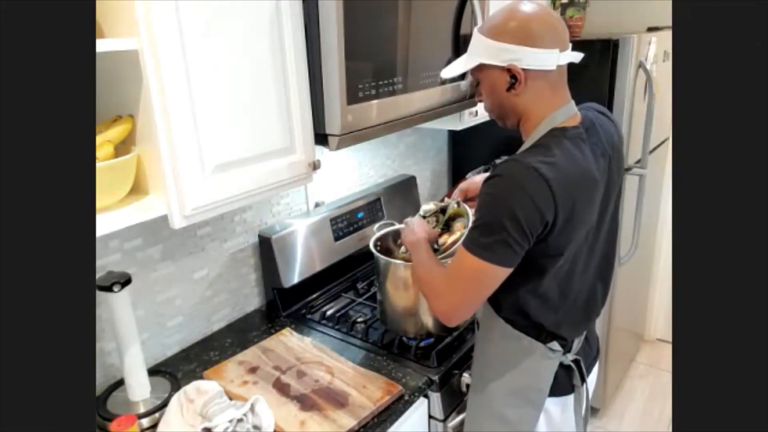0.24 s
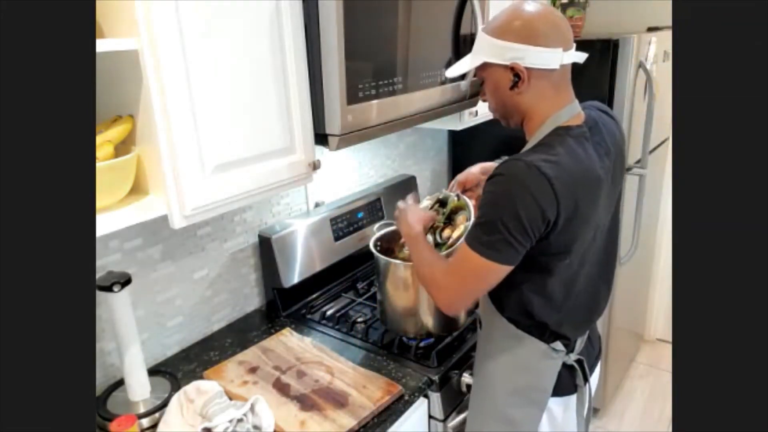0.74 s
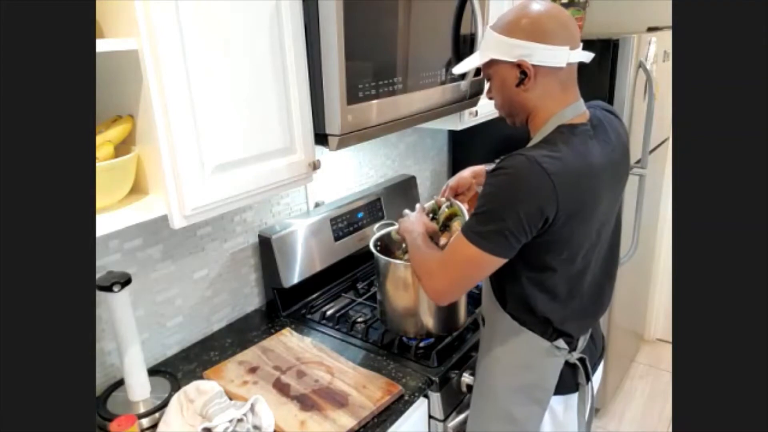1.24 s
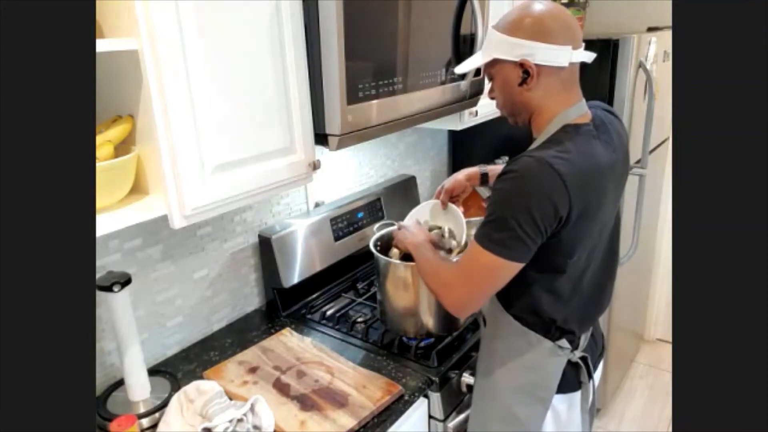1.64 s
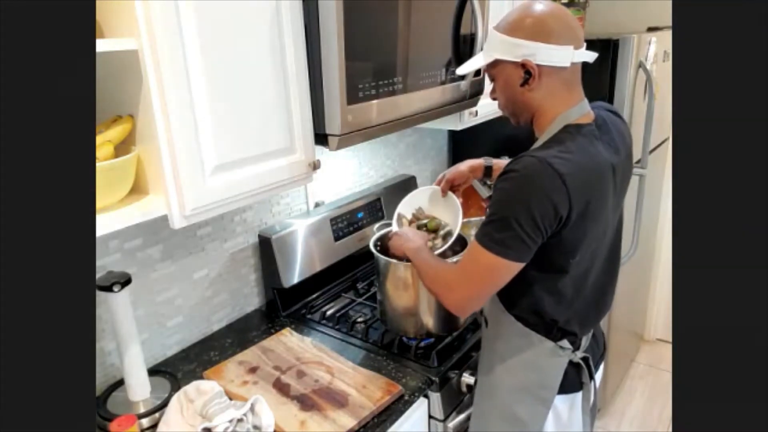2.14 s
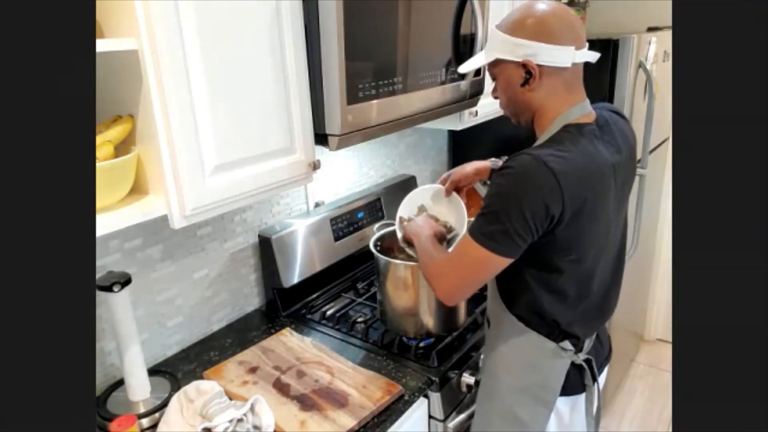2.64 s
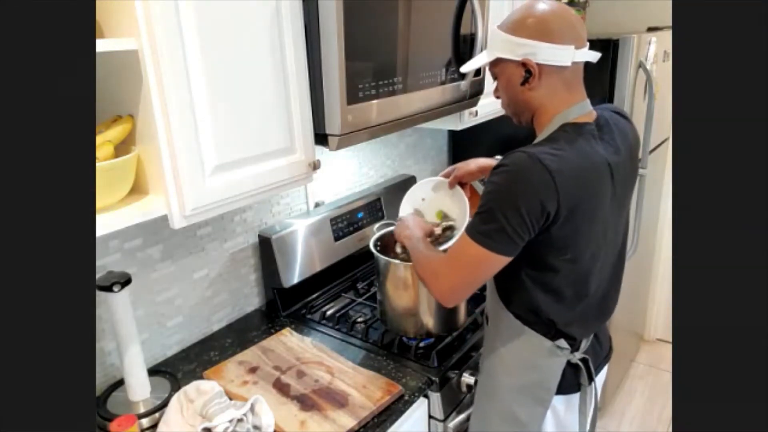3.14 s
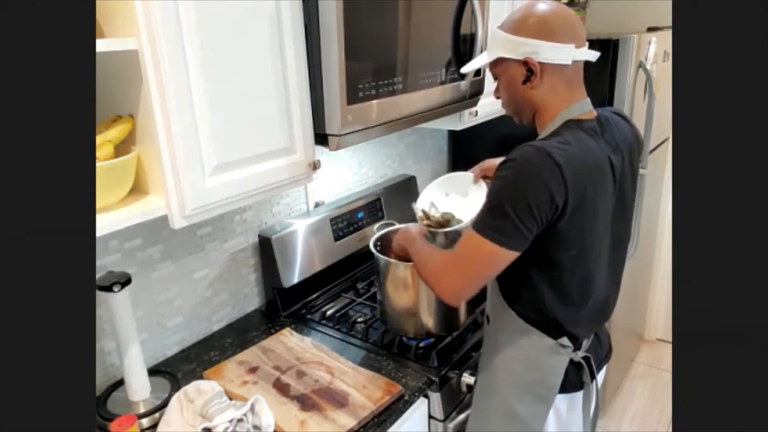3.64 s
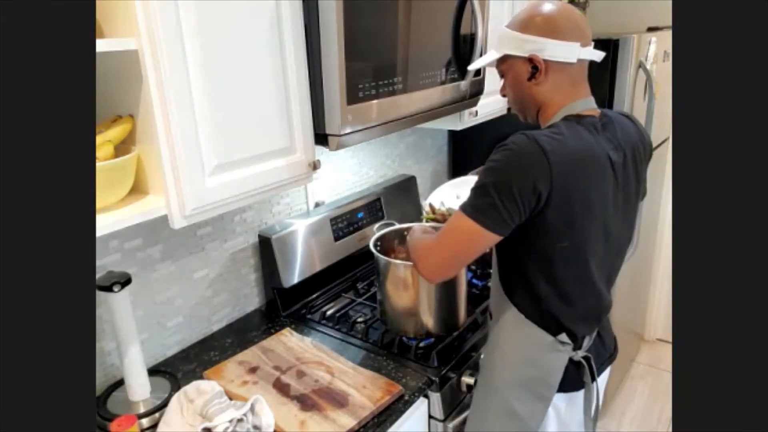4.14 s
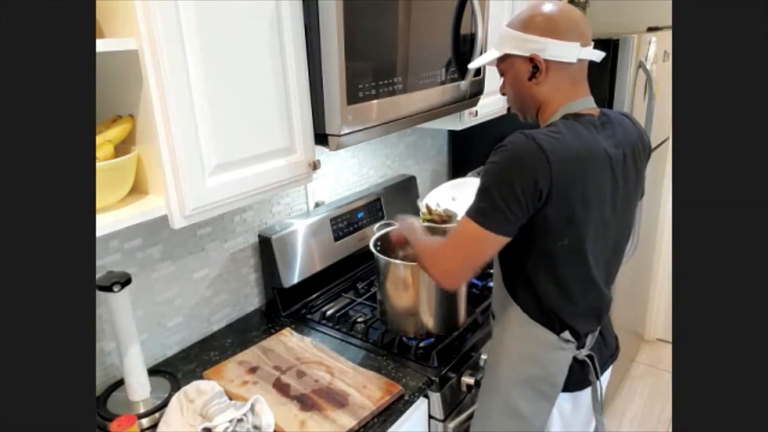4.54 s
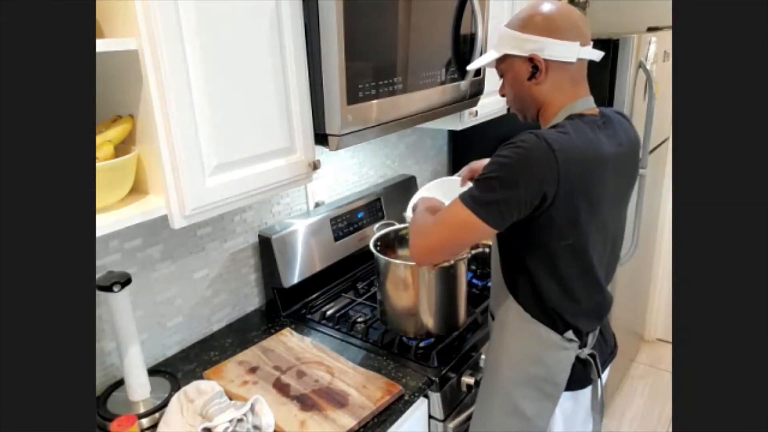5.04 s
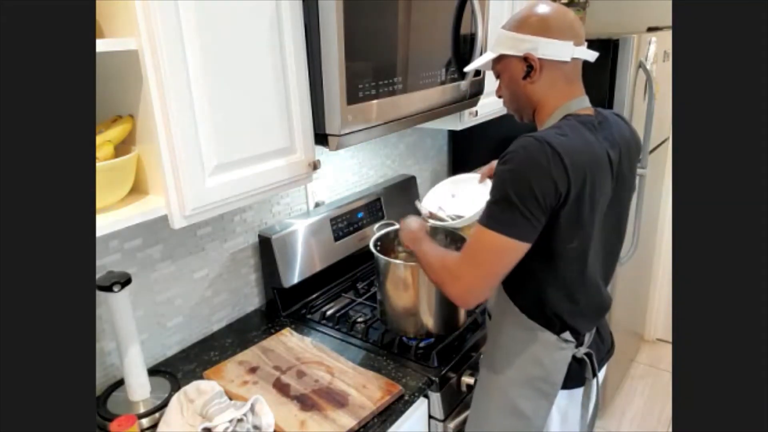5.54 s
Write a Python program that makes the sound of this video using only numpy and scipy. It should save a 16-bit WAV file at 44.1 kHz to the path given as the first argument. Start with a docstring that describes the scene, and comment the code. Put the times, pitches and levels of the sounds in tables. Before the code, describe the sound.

Mussel shells are pushed by hand from a bowl into a steel pot in a hard-walled kitchen. From 0 to 0.3 s strong, hollow knocks arrive in quick succession with a burst of rattle against the pot. Irregular clacks and small scrapes follow until 1.3 s. From 1.4 to 2.15 s the shells pour in a dense, loud, bright clatter, the peak near 1.6 s. A short gap follows, then light clicks and a soft low thump about 2.45 s, with small squeaky rubs to 2.9 s. A second cluster of knocks runs 3.0 to 3.5 s, thinning to faint sparse ticks until 4.4 s. A sharp clack sounds at 4.47 s, a more resonant pair near 4.9 s, and several crisp knocks at 5.1 to 5.4 s, then near silence. The sound is fairly close and speech-band, with little bass; noise suppression cuts echoes abruptly, leaving very faint hiss that drops near 5.7 s.

```python
"""Knock after knock from the start, with handfuls of small shells rattling in between: mussel shells are
pushed by hand out of a bowl into a steel pot. Knocks are bursts of contacts ringing shell and pot modes;
rattling is random ticks; scrapes are noise through one resonance; one low thump is a sinking sine.
Place: a hard-walled kitchen. Distance: direct sound ahead of the echo. Microphone: speech-band,
with a noise suppressor that cuts every tail off into near silence."""
import sys
import numpy as np
from scipy import signal
from scipy.io import wavfile
from scipy.ndimage import uniform_filter1d

SR = 44100
rng = np.random.default_rng(int(sys.argv[2]) if len(sys.argv) > 2 else 0)


def int16_out(signal):
    """Quantize to a 16-bit WAV file."""
    q = np.round(np.clip(np.atleast_2d(signal).T, -1, 1) * 32767)
    wavfile.write(sys.argv[1], SR, q.astype(np.int16))


N = 255780

# Handfuls of small shells sliding and settling:
# [start t/s, length t/s, relative level/dB, pot wall share level/dB]
SLIDES = [(0, 0.064, -23.5, 13.5), (0.17, 0.17, -42, -9.5), (0.41, 0.26, -60, -48),
          (0.963, 0.16, -46, -9.5), (1.412, 0.72, -28.5, -1.5), (2.089, 0.14, -31, -24.5),
          (2.531, 0.13, -39.5, -22.5), (2.909, .38, -38, 13.5), (4.549, 0.067, -55, -20.5),
          (4.996, 0.2, -72.5, -17)]
# Modes of the steel pot: [f/Hz, relative level/dB, base t60 t/s]
POT_MODES = [(222, -11, 0.017), (290.4, -2, 0.26), (428, -20.5, 0.3), (562, -15, 0.17), (676, -9.5, 0.3),
             (744, 9, 0.095), (806, 6.5, 0.06), (967, 8, 0.02), (1020, -8.5, 0.3)]
# Reverberation of the kitchen: [f/Hz, t60 t/s]
KITCHEN_DECAY = [(250, 0.34), (700, 0.43), (2000, 0.38), (6000, 0.2)]
# Shells knocking: [t/s, peak level/dB, strongest shell ring f/Hz, edge against body level/dB,
# pot thump against peak level/dB, ring against peak level/dB, settling neighbours against blow level/dB]
KNOCKS = [(0.0241, -7.5, 695, -5, -13, 1, -10), (0.0841, -7, 1180, -4.5, -16, -1.5, -11),
          (0.157, -5, 5490, 1, -6, -5.5, -5.5), (0.2594, -12.5, 1580, -8, -12, -4, -9),
          (0.391, -26, 4400, -7, -45, -7, -0.5), (0.4454, -34.5, 1980, -4, 13, 7, -1),
          (0.5669, -12, 6060, 1.5, -13.5, -7, -3.5), (0.6454, -22.5, 905, -1, -9.5, -5, 2),
          (0.7185, -36, 780, -5, -24, 5, -12), (0.738, -16, 4540, -1.5, -21.5, -2.5, -2.5),
          (0.8267, -16, 3210, 0, -60, -3.5, -3), (0.921, -17, 2780, -5, -15, 0, -2),
          (0.9469, -11, 904, -18, 2, 3.5, -3), (1.0939, -33, 2590, -15, 3.5, 5, 5),
          (1.1211, -8.5, 782, -3.5, -6.5, 0.5, -7), (1.1405, -23.5, 1010, -10.5, -8.5, 9, -5),
          (1.2055, -23.5, 880, -1.5, -1, 1, 4.5), (1.3851, -18.5, 5200, 11.5, -44, 1, 0),
          (1.428, -16, 5130, 3.5, -24.5, -8, -10.5), (1.491, -13.5, 4390, -24.5, -33.5, -1.5, -5),
          (1.5636, 0, 4840, -3.5, -20, -12, -4), (1.6036, -8, 3030, -9, -19.5, -15, -8.5),
          (1.6172, -10, 5090, -3.5, -25, -5, -7), (1.635, -0.5, 2980, -16.5, -25.5, -4.5, -9),
          (1.6537, -18, 2460, -16, 9, -19, 1.5), (1.7064, -7.5, 1370, -4, -20.5, -12, -7),
          (1.7195, -13, 2900, 4.5, -16, -23, -2.5), (1.8149, -2.5, 1184, 0.5, -24, -5, -1),
          (1.8445, -9.5, 5140, 10, -24, -4, -14.5), (1.9175, -17, 5230, -12, 4.5, -5.5, -9),
          (1.9385, -15.5, 1440, -4.5, -1.5, -3, 3), (1.9665, -15.5, 5000, -3, -21.5, 1, -13.5),
          (2.0033, -10.5, 5330, 4.5, -8.5, -25, -3), (2.0492, -13, 2890, -13, -39, -4.5, -24),
          (2.0718, -30, 1450, -17, -13.5, 12.5, -7), (2.0931, -13.5, 5260, -4.5, -30, -3.5, -14.5),
          (2.1066, -14.5, 4410, 18, -34, 1, -10.5), (2.1171, -9, 2980, 2, -41, -7, 1),
          (2.1288, -8, 1550, -3.5, -1, -5.5, -10.5), (2.3825, -29, 3290, 8, -60, -1, -11.5),
          (2.4533, -18, 5780, 23.5, -32, -7.5, -1), (2.4636, -13, 5030, 13.5, -43.5, 2, -1),
          (2.626, -33, 3250, 0.5, -71.5, -2.5, -12), (2.643, -31.5, 2980, 16.5, -57, 3, -8.5),
          (2.6903, -19.5, 1690, -14.5, -22.5, -5.5, -10.5), (2.7165, -18.5, 1620, -23, -9, 9, -17.5),
          (2.839, -39.5, 1530, -8, -17.5, -4.5, 1.5), (2.9023, -22.5, 740, -8.5, -11, -2, -0.5),
          (2.9761, -21.5, 3940, 7.5, -32, -12, 3), (3.0263, -6.5, 1620, -3.5, -9, -6.5, -12),
          (3.051, -12.5, 3460, 2, 0, -8, -12.5), (3.086, -9, 4840, 4, -14.5, -5.5, -9.5),
          (3.112, -24, 5350, 1, -11, 3.5, -9.5), (3.1589, -10, 3090, 2.5, -40, -4.5, -3),
          (3.234, -15.5, 3020, -17, -7, -11, -5.5), (3.261, -23.5, 1530, -0.5, -20.5, 0, -0.5),
          (3.3059, -22, 3990, -6.5, -7, -0.5, 1), (3.3348, -13, 1535, -3.5, -40, -10.5, -6.5),
          (3.4341, -20, 2094, 16.5, -54, 0, -5), (3.6029, -19, 4960, 21, -21, -21, -1.5),
          (3.6912, -26, 4890, 10.5, -77, -3.5, -10), (3.9041, -27, 5400, -6, -37, -11.5, -0.5),
          (4.0548, -25, 5780, 2, -39, -7, 1.5), (4.101, -23, 5450, 2.5, -27.5, -7, 3.5),
          (4.1934, -48.5, 4230, -9.5, -51, 3, -12.5), (4.2547, -48.5, 4010, -3.5, -56, 5, -8.5),
          (4.413, -30, 5110, 6.5, -34, -10.5, 1.5), (4.4691, -3.5, 5650, 0, -25, -8, 0.5),
          (4.5871, -16.5, 6440, 4.5, -28.5, -18, 3), (4.6262, -19.5, 3920, 2, -30.5, -12.5, -11),
          (4.8529, -32.5, 3040, -5, -2, 1.5, -3), (4.887, -8.5, 4975, -10, 3.5, -2, -5.5),
          (4.9297, -13.5, 634, 4.5, 4.5, 10.5, 1), (5.0585, -25.5, 2870, -14, -16, -23, -3),
          (5.1269, -19, 4680, -18, -37, -10, -6), (5.1898, -11, 3130, -7.5, -1.5, -8.5, -5.5),
          (5.2617, -6.5, 3730, -4, -39.5, -9.5, -7.5), (5.2877, -21, 4770, 0.5, -39, 8, 4),
          (5.3817, -19.5, 3560, -9, -37, 2, -8.5), (5.4335, -33.5, 3035, -16.5, -42, 7, -1)]
# Shells rubbing along bowl or pot, singing at one resonance: [t/s, length t/s, f/Hz, rms level/dB]
SCRAPES = [(0.392, 0.07, 4140, -54), (0.396, 0.055, 6220, -65), (0.438, 0.29, 835, -40),
           (.63, 0.15, 810, -36.5), (1.197, .13, 882, -40.5), (2.38, 0.031, 2200, -49.5),
           (2.382, 0.063, 3530, -49.5), (2.375, .05, 5600, -57.5), (2.647, 0.12, 1610, -37.5),
           (2.648, 0.12, 2926, -45), (2.678, 0.053, 4880, -42), (2.717, 0.078, 880, -34),
           (2.823, 0.055, 1473, -33.5), (3.691, 0.019, 2223, -41), (4.227, 0.051, 3993, -52.5),
           (4.851, 0.24, 3020, -42.5), (5.128, 0.03, 1490, -41)]
# Suppressor threshold, below which a band is turned down: [f/Hz, level/dB]
SUPPRESSOR_THRESHOLD = [(200, -66), (700, -55), (2000, -62.5), (4000, -79), (7000, -77.5)]
# Frequency response of the microphone: [f/Hz, level/dB]
MICROPHONE_RESPONSE = [(30, -39.5), (200, -21.5), (400, -7.5), (6300, 5), (7100, -6.5), (8000, -20.5),
                       (9200, -27.5), (11500, -27.5), (12500, -56), (15000, -68)]
# Spectrum shape of the hiss left in the silences: [f/Hz, relative level/dB]
HISS_SPECTRUM = [(20, -10.5), (100, 0.5), (1000, -6.5), (8000, -6), (12000, -12), (16000, -21.5)]

SLIDE_RISE_DB_PER_S, SLIDE_FALL_DB_PER_S = 304, 244.5
TICKS_PER_S = 500  # on average
BODY_HZ, EDGE_HZ = (1300, 3600), (3600, 7300)  # mode bands of a shell's body and edge
CRUNCH_S, RING_T60_S = .0058, 0.022  # time scale of one blow's contacts; life of the clear ring
SETTLE_RISE_S, SETTLE_FALL_S = 0.0045, 0.044  # neighbours shifting after a knock
THUMP_S, THUMP_DB, THUMP_T60_S = 2.46, -19.5, 0.15  # time, starting level, life
THUMP_HZ, THUMP_SAG_PER_S = 168, 12  # starting pitch and the rate at which it sinks
LAG = 0.13  # share of the suppressor's gain carried over from one 3 ms frame to the next
HISS_DB, OFFSET_DB = -85, -81.5  # hiss rms and converter offset, before the final band limit
CUT_HZ = 15100  # final band limit


def amp(db):
    """Amplitude factor of a level in dB."""
    return 10 ** (np.asarray(db) / 20)


def unit(x):
    """Scales to energy 1."""
    return x / np.linalg.norm(x)


def peaked(x):
    """Scales to peak 1."""
    return x / abs(x).max()


def read(points, hz):
    """Value of a spectrum table at the frequencies hz, interpolated over log frequency."""
    f, value = np.transpose(points)
    return np.interp(np.log(hz + 1), np.log(f + 1), value)


def add(mix, s, sound):
    """Adds a sound at second s."""
    part = mix[round(s * SR):][:len(sound)]
    part += sound[:len(part)]


def coloured(x, points):
    """Causal minimum-phase filter with the given dB curve."""
    log_gain = np.log(amp(read(points, abs(np.fft.fftfreq(8192, 1 / SR)))))
    taps = np.fft.ifft(np.exp(np.conj(signal.hilbert(log_gain)))).real[:2048]
    return signal.oaconvolve(x, taps)[:N]


def ring(hz, db, t60, size=6000):
    """Modes of a struck body: a sum of dying sines, peak 1."""
    t = np.arange(size) / SR
    hz, db, t60 = (np.reshape(v, (-1, 1)) for v in (hz, db, t60))
    modes = amp(db - 60 * t / t60) * np.sin(2 * np.pi * hz * t)
    return peaked(modes.sum(0))


def shell(band_hz, draws, t60, spread_db):
    """Every shell differs: short modes at chance places in a band."""
    place, size, life = draws
    low, high = band_hz
    return ring(low + (high - low) * place, spread_db * size, t60 * (.5 + life), size=1000)


def rattle():
    """Many small ticks, a few large, each ringing one of a heap of shells and the pot wall."""
    t = np.arange(N) / SR
    level, on_wall = np.zeros(N), np.zeros(N)
    for s, length, db, wall_db in SLIDES:
        rise = SLIDE_RISE_DB_PER_S * (t - s)
        fall = SLIDE_FALL_DB_PER_S * (s + length - t)
        slide = amp(db + np.minimum(0, np.minimum(rise, fall)))
        level += slide
        on_wall += slide * amp(wall_db)
    sizes = amp(5.1 * np.minimum(rng.exponential(1, N), 5))
    ticks = sizes * (rng.random(N) < TICKS_PER_S / SR)
    which, draws = rng.integers(0, 12, N), rng.random((12, 3, 24))  # each tick picks one of twelve shells
    heap = np.zeros(N)
    for k, d in enumerate(draws):
        one_shell = shell((BODY_HZ[0], EDGE_HZ[1]), d, .01, 12)
        heap += signal.oaconvolve(ticks * level * (which == k), one_shell)[:N]
    wall = signal.oaconvolve(ticks * on_wall, ring(*np.transpose(POT_MODES)))[:N]
    tick_scale = np.sqrt((ticks ** 2).sum() / N * 50)
    return amp(5) * (heap + 0.16 * wall) / tick_scale


def kitchen(x):
    """Sparse reflections of random sign, each band dying at its own speed.

    Three random echo patterns fade into one another in turn, keeping the tail even."""
    out = np.zeros(N)
    turn = np.arange(N) / SR * 2 * np.pi * 9
    for k in range(3):
        taps = np.zeros(SR // 2)
        places = np.arange(400, 22000, 20) + rng.integers(0, 20, 1080)
        taps[places] = rng.choice([-1., 1.], 1080)
        hz, t, z = signal.stft(taps, SR, nperseg=256)
        decay = amp(-60 * t / read(KITCHEN_DECAY, hz)[:, None])
        tail = signal.istft(z * decay, SR, nperseg=256)[1]
        share = np.sqrt(2 / 3) * np.cos(turn + k * np.pi / 3)  # the three squared shares sum to 1
        out += signal.fftconvolve(x * share, unit(tail))[:N]
    return out


def knocks():
    """A crunch of tiny contacts rings the shell's modes and thumps the pot; the neighbours then settle."""
    out, rings = np.zeros(N), np.zeros(N)
    draws = rng.random((len(KNOCKS), 3, 50))
    grit = rng.standard_normal((len(KNOCKS), 3, 5000))
    pot_hz, pot_db, pot_t60 = np.transpose(POT_MODES)
    t = np.arange(5000) / SR
    blow = t * np.exp(-(t / CRUNCH_S) ** 2)  # swells, then stops short
    settle_shape = (1 - np.exp(-t / SETTLE_RISE_S)) ** 2 * np.exp(-t / SETTLE_FALL_S)
    thud = ring([710, 450, 310, 162], [1.5, -3.5, -5.5, -7.5], [.012, .02, .03, .04])
    for (s, db, hz, edge_db, thump_db, note_db, settle_db), d, g in zip(KNOCKS, draws, grit):
        start = max(s - .001 - .3 * CRUNCH_S, 0)
        settle = settle_shape * amp(12 * uniform_filter1d(g[2], size=100))
        force = unit(blow) + amp(settle_db) * unit(settle)
        contacts = force * g[0] * amp(3.76 * g[1])  # uneven: a few contacts stand out

        body = signal.oaconvolve(contacts, shell(BODY_HZ, d[:, :16], .011, 8))
        edge = signal.oaconvolve(contacts, shell(EDGE_HZ, d[:, 16:40], .007, 8))
        add(out, start, amp(db) * peaked(unit(body) + amp(edge_db) * unit(edge)))
        # unfiltered contact noise, adding faint treble above the shell modes
        add(out, start, amp(db - 19.5) * peaked(contacts))

        clear_ring = ring([hz, 0.47 * hz], [0, -6], [RING_T60_S, 0.18 * RING_T60_S], size=2000)
        note = signal.oaconvolve(clear_ring, blow[:1500] * g[2, :1500])
        add(rings, start, amp(db + note_db) * peaked(note))

        # the struck spot picks the pot's modes
        wall = ring(pot_hz, pot_db + 7 * d[1, 41:], pot_t60 * (0.9 + d[2, 41:]))
        pot = signal.oaconvolve(0.47 * wall + .9 * thud, contacts[:800])
        add(out, s, amp(db + thump_db) * peaked(pot))
    return out, rings


def scrapes():
    """Rough friction noise rings one resonance for as long as the shell slides."""
    out = np.zeros(N)
    grit = rng.standard_normal((len(SCRAPES), 14000))
    for (s, length, hz, db), g in zip(SCRAPES, grit):
        size = round(length * SR)
        rub = g[:size] * signal.windows.tukey(size, .3)
        song = signal.oaconvolve(rub, ring(hz, 0, 0.035, size=1500))
        add(out, s, amp(db) * np.sqrt(size) * unit(song))
    return out


def thump():
    """One low bump, as of the bowl touching the pot rim; its pitch sinks as it dies."""
    out, t = np.zeros(N), np.arange(4000) / SR
    phase = 2 * np.pi * np.cumsum(THUMP_HZ * np.exp(-THUMP_SAG_PER_S * t)) / SR
    add(out, THUMP_S, amp(THUMP_DB - 60 * t / THUMP_T60_S) * np.sin(phase))
    return out


def scene():
    """Shells and their echo in the kitchen; the clear rings point at the microphone and echo less."""
    clatter, rings = knocks()
    clatter = clatter + rattle()
    rings = rings + scrapes() + thump()
    echo = kitchen(clatter + .5 * rings)
    return (clatter + rings + amp(-6) * echo)[None]


def suppress(x):
    """Compares the smoothed power of broad bands with a threshold and turns down what falls below."""
    hz, t, z = signal.stft(x, SR, nperseg=512, noverlap=384)
    threshold = amp(2 * read(SUPPRESSOR_THRESHOLD, hz))[:, None]  # as power
    over = uniform_filter1d(abs(z) ** 2 / threshold, size=9, axis=1)
    over = uniform_filter1d(over, size=7, axis=0)
    over = abs(uniform_filter1d(over, size=5, axis=0))
    over = over ** 0.24 * over[4:85].mean(0) ** 0.09  # the whole speech band has a say
    keep = (over ** 2 / (1 + over ** 2)) ** 5.5
    # the gain follows late
    keep = signal.lfilter([1 - LAG], [1, -LAG], keep, axis=1, zi=LAG * keep[:, :1])[0]
    # the outer bands follow their neighbours
    keep[:3], keep[80:] = keep[3:7].mean(0), keep[60:80].mean(0)
    return signal.istft(z * keep, SR, nperseg=512, noverlap=384)[1][:N]


def record(dry):
    """Soft overload, suppressor, speech-band colour, a faint hiss that drops near the end, band limit."""
    hiss = coloured(rng.standard_normal(N), HISS_SPECTRUM)
    hiss = amp(HISS_DB) * hiss / hiss.std() - amp(OFFSET_DB)
    hiss *= np.interp(np.arange(N) / SR, [5.66, 5.69], [1, .1])  # hiss and offset fall to a tenth
    overloaded = .6 * np.tanh(dry[0] / .6)
    out = coloured(suppress(overloaded), MICROPHONE_RESPONSE) + hiss
    band_limit = signal.firwin(511, CUT_HZ, window=("kaiser", 9), fs=SR)
    return signal.oaconvolve(out, band_limit, "same")[None]


dry = scene()
out = record(dry)
int16_out(out)
```